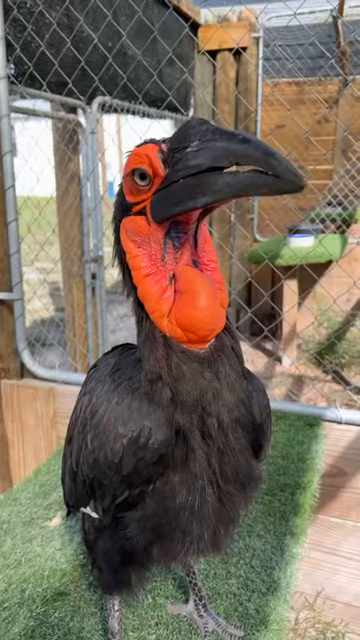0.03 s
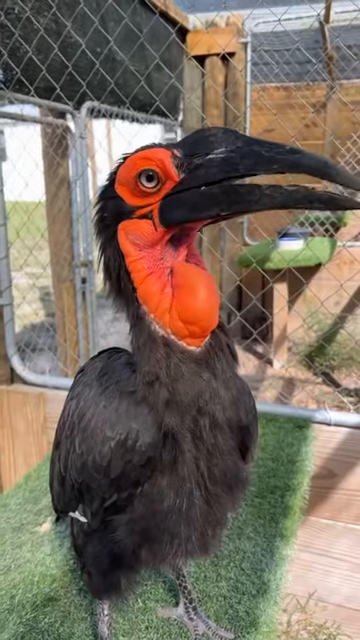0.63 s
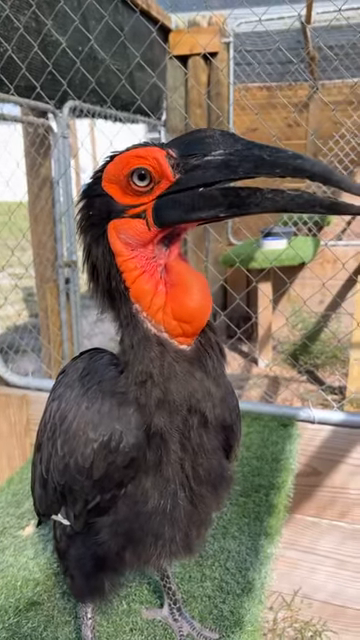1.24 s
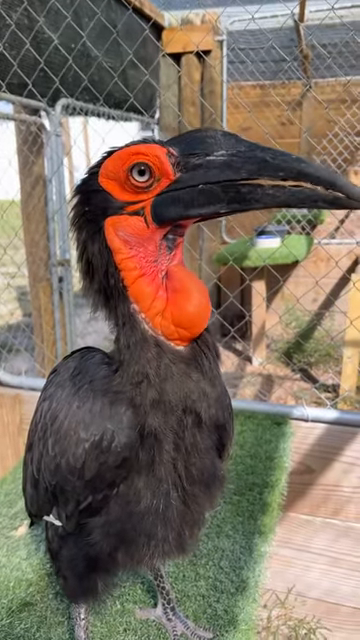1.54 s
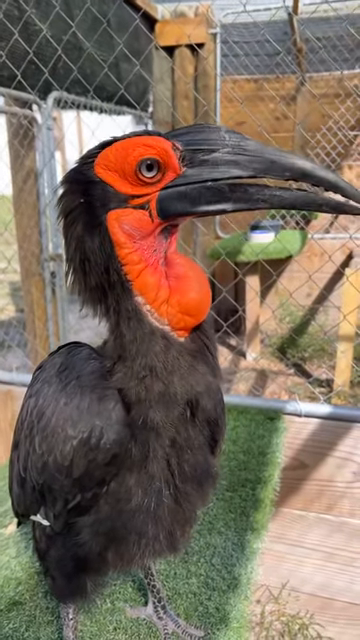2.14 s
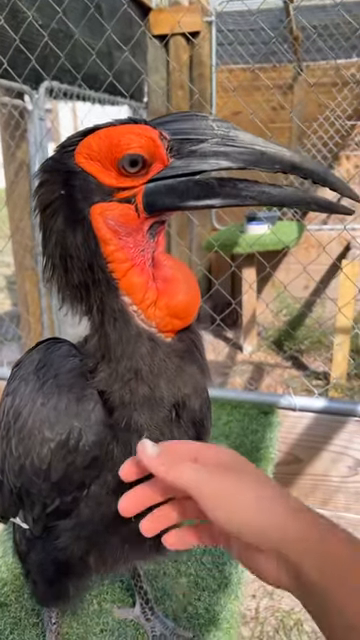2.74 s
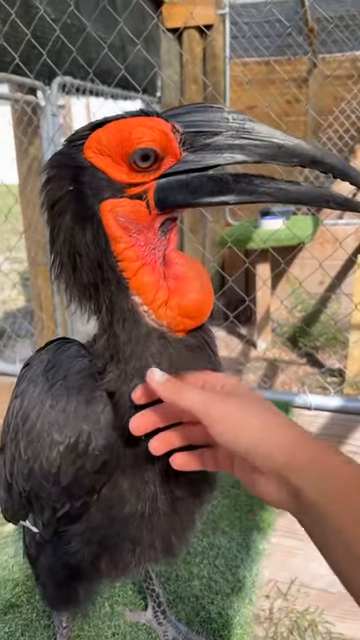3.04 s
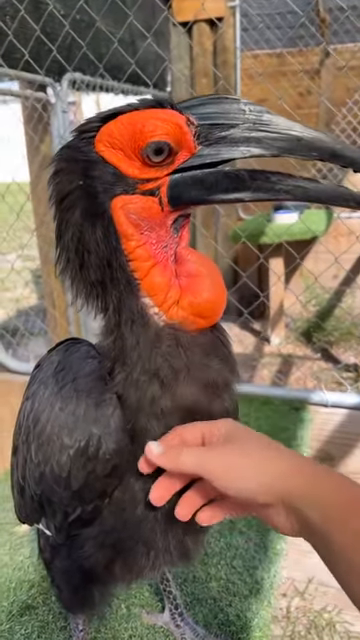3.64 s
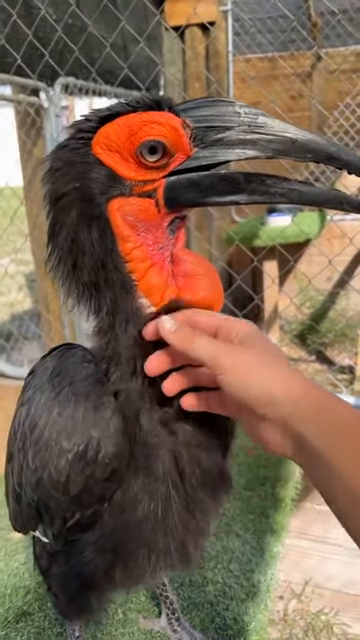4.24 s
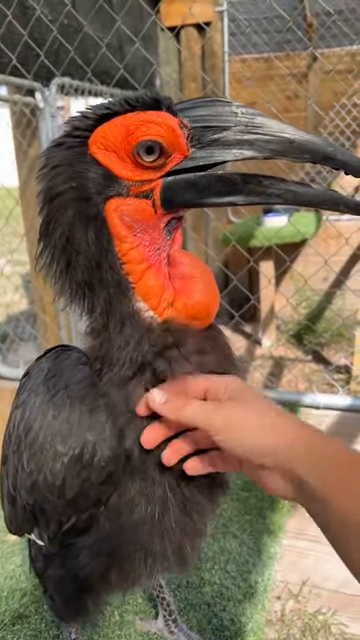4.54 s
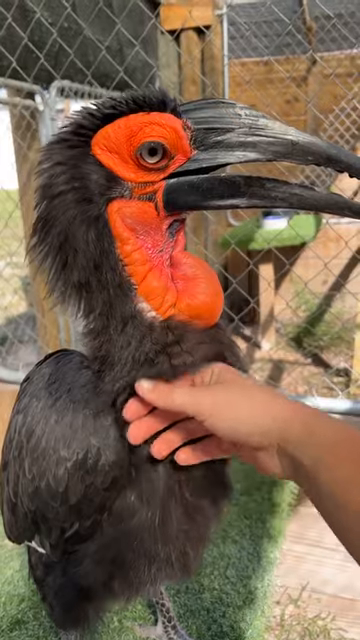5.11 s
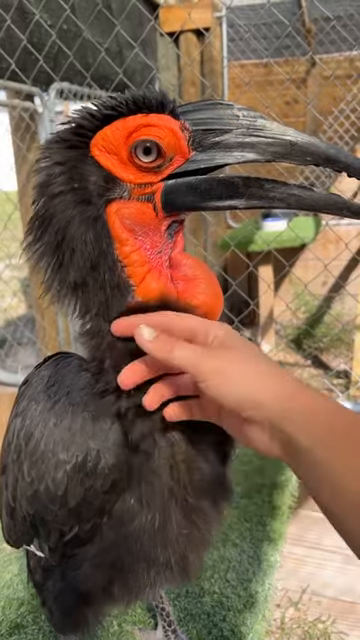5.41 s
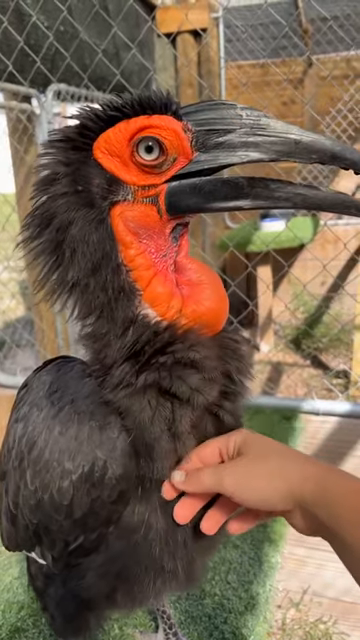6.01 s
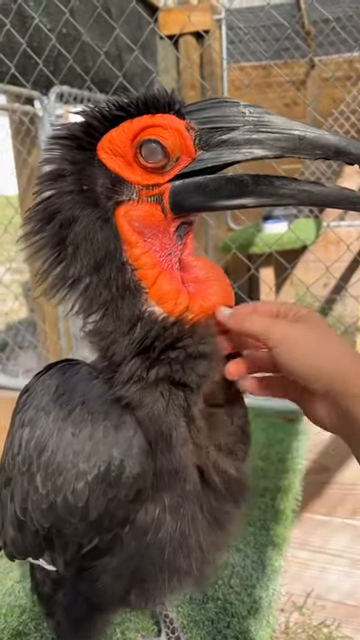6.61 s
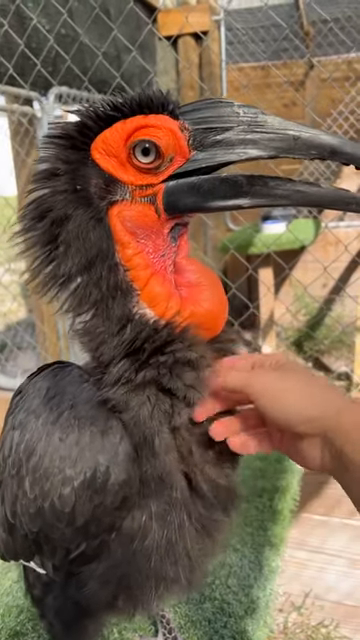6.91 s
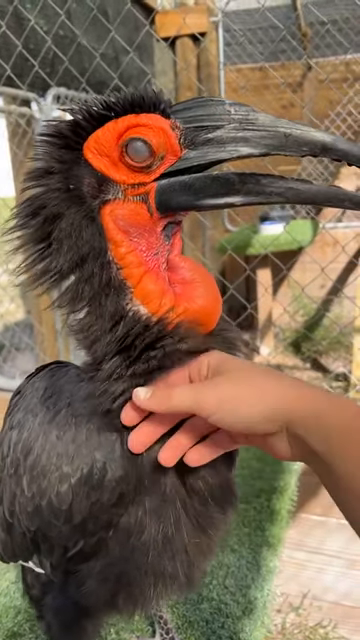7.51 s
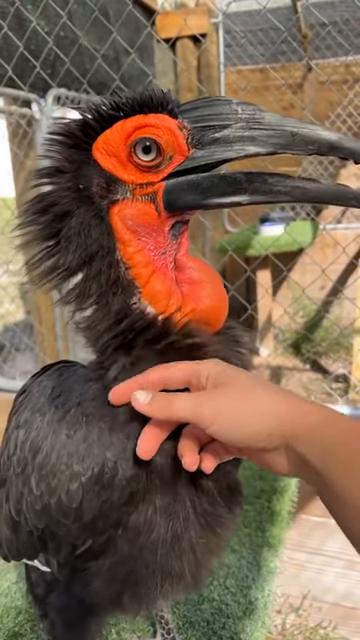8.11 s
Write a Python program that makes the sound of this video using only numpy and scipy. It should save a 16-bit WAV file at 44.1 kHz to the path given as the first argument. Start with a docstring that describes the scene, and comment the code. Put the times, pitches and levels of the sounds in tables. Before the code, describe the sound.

In a quiet outdoor aviary, a steady hiss of air and the low hum of cooling machines run throughout, growing slightly louder. Close to the microphone come a few faint dry ticks, then soft rustles and crackles as a hand strokes a large bird's feathers. A small bird gives a thin, high chip far away every few seconds. Everything stays very soft.

```python
"""In a quiet outdoor aviary, a hand strokes the neck feathers of a large ground bird that hardly stirs.
The feathers whisper and crackle as their tiny branches, the barbs, catch and slip.
A few faint ticks sound close by, and a small bird chips far away every few seconds.
Cooling machines hum some way off under a steady hiss of air; both grow as the microphone drifts closer."""
import sys
import numpy as np
from scipy import signal
from scipy.fft import rfft, irfft, next_fast_len
from scipy.io import wavfile
from scipy.ndimage import uniform_filter1d, map_coordinates

SR = 44100
rng = np.random.default_rng(int(sys.argv[2]) if len(sys.argv) > 2 else 0)


def materialize(psi):
    """Save the field psi as 16-bit PCM at rate SR to the path in sys.argv[1].

    A 1-D psi becomes a single channel; in a 2-D psi each row is a channel.
    """
    bounded = np.clip(np.atleast_2d(psi).T, -1, 1)
    quanta = np.round(bounded * 32767).astype(np.int16)
    wavfile.write(sys.argv[1], SR, quanta)


N = 368676


def amp(db):
    """Turn decibels into a number to multiply a sound by."""
    return 10 ** (np.asarray(db) / 20)


def unit(x):
    """Scale a sound so its average strength (rms) is 1."""
    return x / np.sqrt(np.mean(x ** 2) + 1e-20)


def clock():
    """The time of every sample, in seconds."""
    return np.arange(N) / SR


def along(points, hz):
    """Read between the rows of a (pitch_hz, value) table, with octaves evenly spaced."""
    pitches, values = np.transpose(points)
    return np.interp(np.log(hz + 1), np.log(pitches + 1), values)


def wobble(turns_per_s):
    """A smooth random curve that wanders around zero."""
    return map_coordinates(rng.standard_normal(512), [clock() * turns_per_s + 2], mode="mirror")


def swell(t, half_s):
    """A bell-shaped rise and fall around t = 0."""
    return np.exp(-.5 * (t / half_s) ** 2)


def filtered(x, gain_at):
    """Turn each pitch in a sound up or down by gain_at(hz)."""
    size = next_fast_len(len(x) + 8192)
    return irfft(rfft(x, size) * gain_at(np.fft.rfftfreq(size, 1 / SR)), size)[:len(x)]


def add(track, start_s, sound):
    """Mix a sound into the track."""
    part = track[max(round(start_s * SR), 0):][:len(sound)]
    part += sound[:len(part)]


def nearing(start_db, gained_db, start_s=0.39, end_s=6.16):
    """The level in dB of a steady sound while the microphone eases closer."""
    progress = np.clip((clock() - start_s) / (end_s - start_s), 0, 1)
    return start_db + gained_db * np.sin(np.pi * progress / 2) ** 2


# The tone of rubbing feathers: pitch_hz, relative_db
FEATHER_TONE = [(800, -25), (2200, 5.5), (4800, -5.5), (7500, 4), (9500, -3), (10500, -9), (13000, -5.5),
                (15700, -12)]
def swish(size, tilt_db, slips_per_s=1800):
    """Barbs slip in turn: tiny snaps over soft rubbing noise. More tilt sounds brighter."""
    snaps = unit(rng.standard_normal(size) * (rng.random(size) < slips_per_s / SR))
    rubbing = snaps + 0.98 * rng.standard_normal(size)
    tone = lambda hz: amp(along(FEATHER_TONE, hz) + tilt_db * np.log2(np.maximum(hz, 500) / 5000))
    return unit(filtered(rubbing, tone))


def stroking(start_s=3.1, up_and_down_s=1.13, level_db=-72.5):
    """The hand brushes up and down; the feathers whisper with its speed and rest at each turn."""
    speed = np.abs(np.sin(2 * np.pi * np.maximum(clock() - start_s, 0) / up_and_down_s))
    return amp(level_db + 2 * wobble(8)) * speed * swish(N, tilt_db=-2)


# The bird shifts or the fingers catch a feather: middle_s, half_length_s, level_db, tilt_db_per_octave
RUSTLES = [(2.18, 0.054, -69, 1), (2.37, .04, -64, -8), (2.678, 0.0059, -63.5, 2), (2.758, 0.07, -69, -1),
           (2.968, 0.017, -61.5, 0), (3.627, .013, -62.5, 7), (3.765, .01, -58.5, -1),
           (3.938, 0.0096, -54, 1.5), (4.982, 0.063, -69, -6), (5.812, 0.044, -68, -0.5),
           (6.12, .043, -65, -2), (6.252, 0.034, -67.5, 2), (6.466, .005, -54, -5),
           (6.478, 0.054, -59.5, -2), (6.547, .007, -57, 2), (7.041, 0.074, -69, 0), (8.259, 0.044, -65, 0)]
def feather_rustles(crackle_db=2.0, catches_per_s=190):
    """Each rustle swells and fades, crackling as the barbs catch and let go."""
    out, t = np.zeros(N), np.arange(-SR // 2, SR // 2) / SR
    for middle_s, half_s, level_db, tilt_db in RUSTLES:
        add(out, middle_s + t[0], amp(level_db) * swell(t, half_s) * swish(len(t), tilt_db))
    return out * unit(amp(crackle_db * wobble(catches_per_s)))


# Small dry ticks close by: start_s, level_db, pitch_hz
LIGHT_TICKS = [(0.593, -59, 1950), (0.634, -56, 2030), (1.524, -54, 1880), (2.55, -54.5, 2400),
               (2.782, -55.5, 2850), (2.808, -57, 7600), (4.445, -55, 1200), (5.89, -56, 2510),
               (6.003, -52.5, 2110), (6.505, -53, 2870), (8.097, -51.5, 2600)]
def ticks(rise_s=0.001, fade_s=0.065, dull_above_hz=5000, sharpness=5):
    """Each light touch makes a short burst of noise that rings loosely around one pitch."""
    out, t = np.zeros(N), np.arange(SR // 5) / SR
    for start_s, level_db, pitch_hz in LIGHT_TICKS:
        ring = lambda hz: 1j * hz * pitch_hz / (sharpness * (pitch_hz**2 - hz**2) + 1j * hz * pitch_hz)
        soft_ring = lambda hz: ring(hz) / (1 + (hz / dull_above_hz) ** 2)
        burst = unit(filtered(rng.standard_normal(len(t)), soft_ring))
        loudness = amp(level_db - 60 * t / fade_s) * (1 - np.exp(-t / rise_s))
        add(out, start_s, loudness * burst)
    return out


# The far bird's calls: loudest_s, top_pitch_hz, relative_db
BIRD_CHIPS = [(0.247, 7400, -61), (2.745, 7600, -61), (5.394, 7870, -60.5), (7.906, 7300, -57.5)]
def small_bird(slide_hz=1300, slide_s=0.00555, rise_s=0.0081, fade_s=0.012, rasp_hz=220):
    """A thin, slightly raspy chip slides up to its top pitch and fades there."""
    out, t = np.zeros(N), np.arange(-SR // 10, SR // 10) / SR
    for loudest_s, top_hz, db in BIRD_CHIPS:
        rasp = unit(uniform_filter1d(rng.standard_normal(len(t)), size=40))
        pitch_hz = top_hz - slide_hz / (1 + np.exp((t + .014) / slide_s)) + rasp_hz * rasp
        loudness = amp(db) * 2 / (np.exp(-t / rise_s) + np.exp(t / fade_s))
        add(out, loudest_s + t[0], loudness * np.sin(2 * np.pi * np.cumsum(pitch_hz) / SR))
    return out


# How long the yard's echo takes to drop by 60 dB: pitch_hz, fade_s
ECHO_FADES = [(300, .4), (3000, 0.54), (12000, 0.3)]
def yard_echo(x):
    """Fences and sheds scatter a sound into a short echo."""
    hz, t, noise = signal.stft(rng.standard_normal(SR // 2), SR, nperseg=256)
    fading = amp(-60 * t / along(ECHO_FADES, hz)[:, None])
    tail = signal.istft(noise * fading, SR, nperseg=256)[1]
    return signal.fftconvolve(x, tail / np.linalg.norm(tail))[:N]


def hum(base_hz, tones, waver_db, drift_radians):
    """Pure tones at multiples of one pitch; the higher ones waver more in level and timing."""
    out = np.zeros(N)
    for multiple, db in tones:
        looseness = np.sqrt(multiple)
        phase = 2 * np.pi * (multiple * base_hz * clock() + rng.random())
        phase += drift_radians * looseness * wobble(1.964)
        loudness = amp(db + waver_db * looseness * np.tanh(wobble(1.84)))
        out += loudness * np.sqrt(2) * np.sin(phase)
    return out


# The tones of the electric hum: multiple_of_mains, relative_db
COIL_TONES = [(2, 1), (4, -13), (6, -31)]
def coils(mains_hz=60.02):
    """The machines' wire coils hum at twice the rate of the mains power."""
    loudness = amp(nearing(start_db=-50, gained_db=3.5))
    return loudness * hum(mains_hz, COIL_TONES, waver_db=0.54, drift_radians=0.042)


# The tones of the cooling pump: multiple_of_shaft, relative_db
COMPRESSOR_TONES = [(1, 0.5), (2, -7.5), (3, -14.5), (5, -20)]
def compressor(shaft_hz=55.87):
    """The motor turns just under the mains rate and throbs against the hum; its casing drones along."""
    loudness = amp(nearing(start_db=-58.5, gained_db=6.5))
    motor = loudness * hum(shaft_hz, COMPRESSOR_TONES, waver_db=1.0, drift_radians=0.051)
    # the casing rings at four times the shaft rate and swells once
    casing = np.sin(2 * np.pi * 4 * shaft_hz * clock())
    casing_db = -66 + 9.5 * swell(clock() - 2.03, half_s=0.61)
    return motor + amp(casing_db) * casing


# The tones of the fan motor: multiple_of_shaft, relative_db
FAN_TONES = [(1, -1), (3, -0.5), (8, -17.5), (10, -20.5)]
def fan_motor(shaft_hz=59.14):
    """The fan also slips just behind the mains rate, adding a faint, wavering hum."""
    return amp(-67.5) * hum(shaft_hz, FAN_TONES, waver_db=2.1, drift_radians=.25)


# Where the fan's air stream rings: pitch_hz, width_hz, relative_db
WHIRR_PEAKS = [(853, 62, 0.5), (1178, 113, 1), (2028, 350, 1.5), (2960, 410, -5.5), (6770, 400, -13.5),
               (9400, 560, -11)]
def fan_whirr():
    """Air from the fan sings faintly around a few pitches."""
    peaks = lambda f: sum(amp(db) / (1 + (2 * (f - hz) / width) ** 2) for hz, width, db in WHIRR_PEAKS)
    loudness = amp(nearing(start_db=-69, gained_db=0.2) + 0.72 * wobble(4.3))
    return loudness * unit(filtered(rng.standard_normal(N), peaks))


def rush(tone, patchy_db):
    """Rushing noise of a given tone, with soft random patches that are louder or quieter."""
    grid = signal.stft(rng.standard_normal(N), nperseg=512)[2]
    patches = uniform_filter1d(rng.standard_normal(grid.shape), size=7, axis=0)  # blur across pitch
    patches = uniform_filter1d(patches, size=12, axis=1)  # blur across time
    noise = signal.istft(grid * amp(patchy_db * unit(patches)), nperseg=512)[1][:N]
    return unit(filtered(noise, lambda hz: amp(along(tone, hz))))


# The tone of the low, middle and high layers of outdoor air: pitch_hz, relative_db
RUMBLE_TONE = [(10, -16), (25, -21), (36, -6.5), (48, 1.5), (62, 5), (74, 5), (90, -5), (130, -7.5),
               (200, -42.5)]
BREEZE_TONE = [(60, -13), (130, -1.5), (190, 0.5), (310, 0.97), (400, -4.5), (600, -7), (930, -12.5),
               (1200, -13.5), (1550, -16.5), (2050, -16), (2450, -16), (2950, -17.5), (4200, -22.5),
               (6000, -53)]
HISS_TONE = [(2500, -28), (4200, -1.5), (5200, -2.5), (6100, 2), (7000, 3), (8000, 1.5), (8600, -2.5),
             (9700, -0.5), (9950, 1.5), (10250, -41), (11200, -20), (12200, -7.5), (13600, -10),
             (15700, -9)]
def outdoor_air():
    """A distant rumble, the wash of moving air and a fine hiss above it."""
    rumble = amp(nearing(-59, 4.5) + 0.65 * wobble(8.4)) * rush(RUMBLE_TONE, patchy_db=-0.5)
    breeze = amp(nearing(-57.5, 2.5) + 0.09 * wobble(5.5)) * rush(BREEZE_TONE, patchy_db=0.98)
    hiss = amp(nearing(-71, 3)) * rush(HISS_TONE, patchy_db=1.74)
    return rumble + breeze + hiss


def scene():
    """Mix everything into one channel; only the small bird comes with the yard's echo."""
    chips = small_bird()
    far_bird = amp(-1.5) * chips + amp(-4) * yard_echo(chips)
    background = coils() + compressor() + fan_motor() + fan_whirr() + outdoor_air()
    close_by = feather_rustles() + ticks()
    return (close_by + far_bird + background)[None]


def record(dry, start_s=0.2135, fade_in_s=0.013, highest_hz=15720):
    """The microphone switches on after a moment and misses the very highest pitches."""
    switched_on = np.clip((clock() - start_s) / fade_in_s, 0, 1)
    return np.array([filtered(channel * switched_on, lambda hz: hz < highest_hz) for channel in dry])


dry = scene()
out = record(dry)
materialize(out)
```